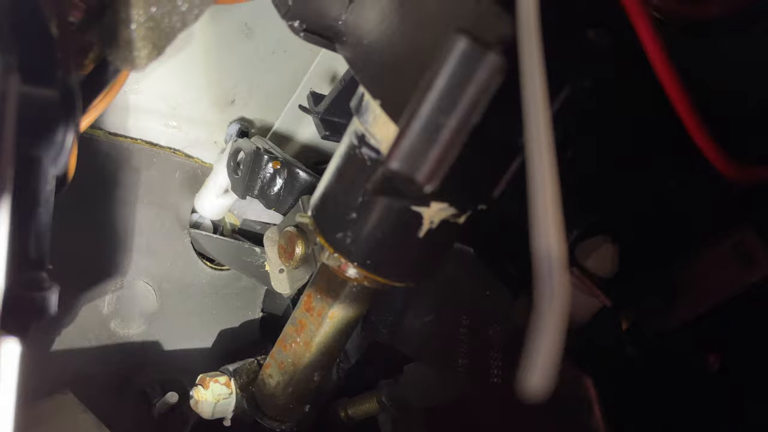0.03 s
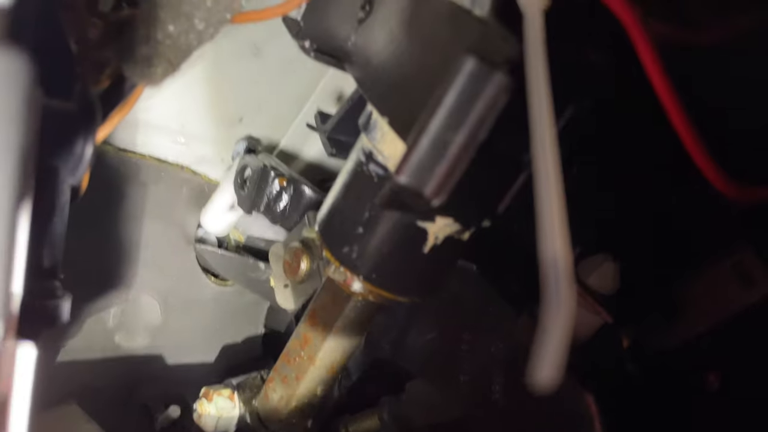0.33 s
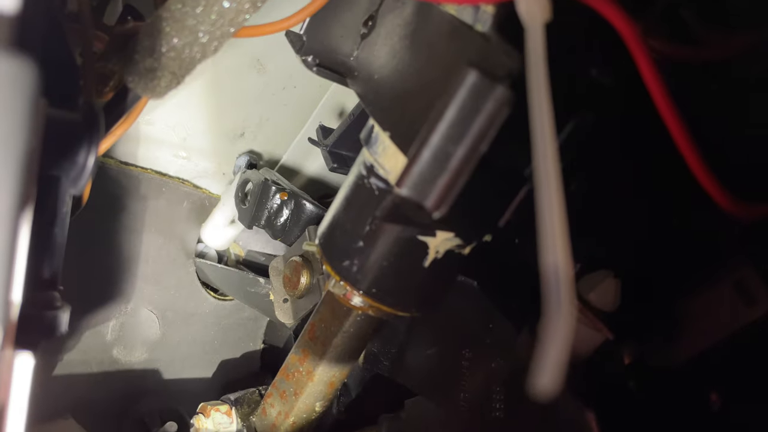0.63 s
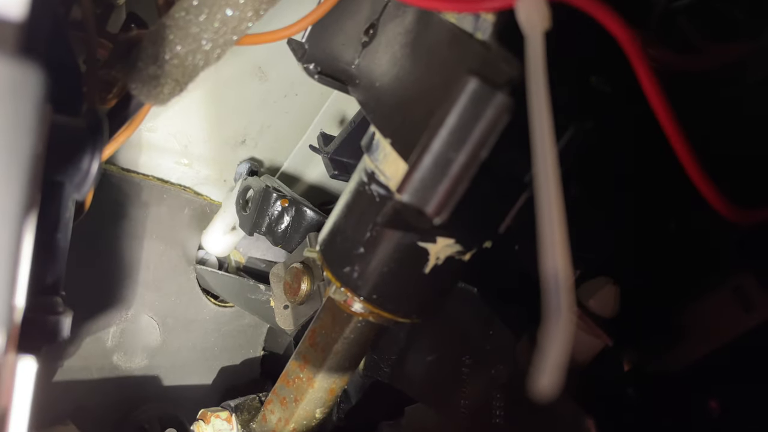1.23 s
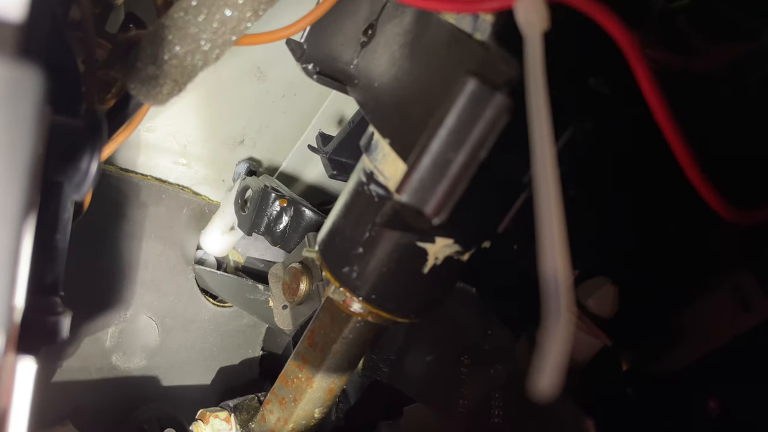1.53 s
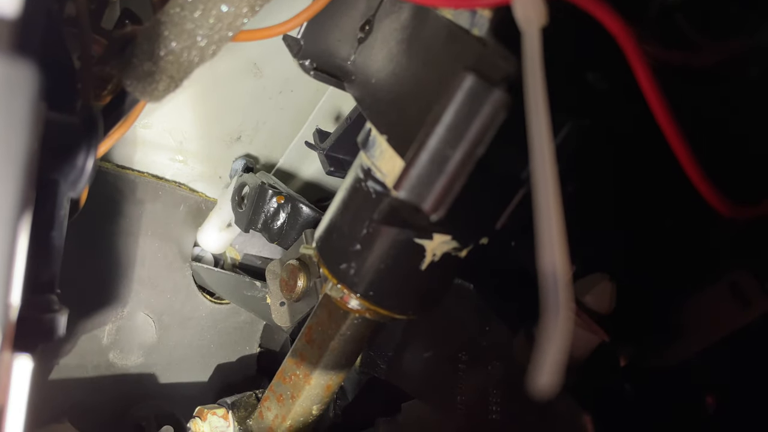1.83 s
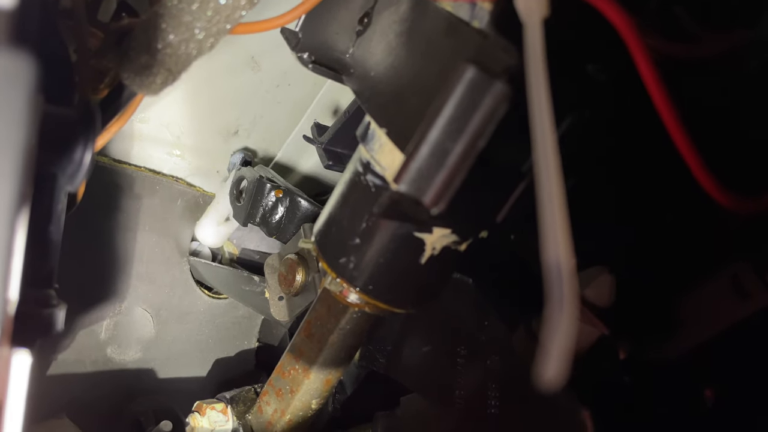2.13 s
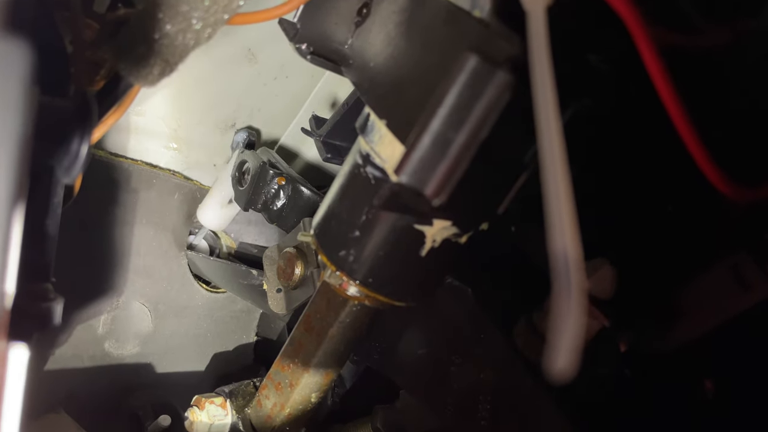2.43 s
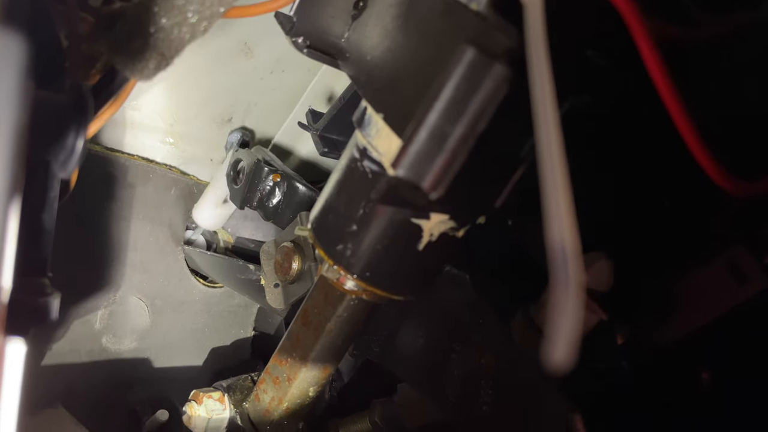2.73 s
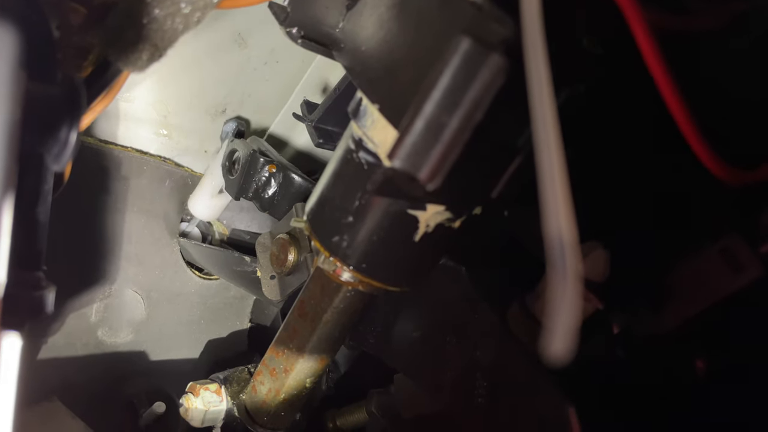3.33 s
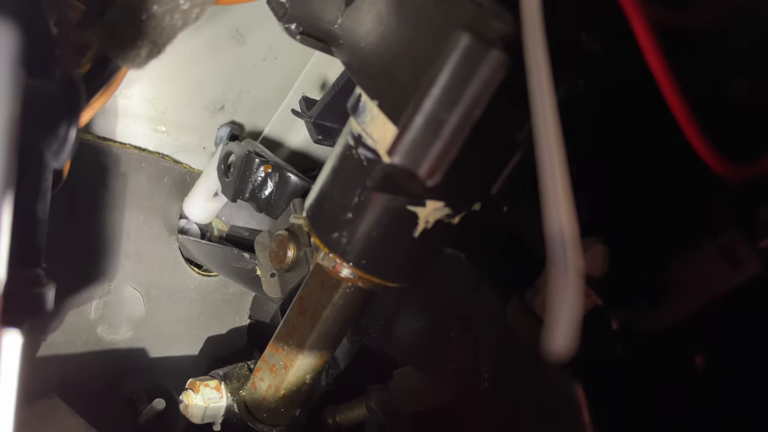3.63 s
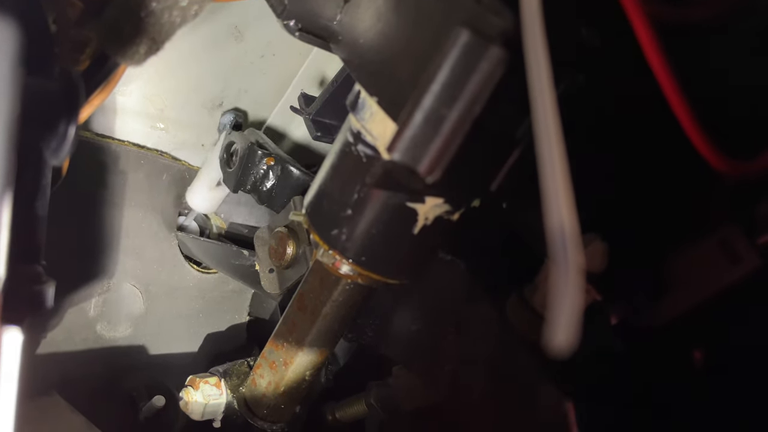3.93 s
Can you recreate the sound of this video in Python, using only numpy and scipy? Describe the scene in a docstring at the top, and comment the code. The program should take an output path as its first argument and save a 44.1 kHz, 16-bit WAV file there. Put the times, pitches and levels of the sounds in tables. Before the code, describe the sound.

A metal pedal linkage knocks and clicks irregularly over a low handling rumble.

```python
"""Under a car dashboard, a metal pedal linkage is worked by hand, close to the microphone.
The pedal rubs as it moves, and knocks at its stops ring the bracket and boom in the bulkhead, the wall
behind it. Loose parts tap, surfaces scrape, and the joints click and once slip with a rasp.
Below it all lie a slowly sinking hum, handling rumble and faint hiss."""
import sys
import numpy as np
from scipy import signal
from scipy.fft import rfft, irfft
from scipy.io import wavfile
from scipy.ndimage import uniform_filter1d

SR = 44100
rng = np.random.default_rng(int(sys.argv[2]) if len(sys.argv) > 2 else 0)


def bounce(signal):
    """Save signal as a 16-bit WAV file at the path given by the first command-line argument."""
    frames = np.transpose(np.atleast_2d(signal))
    limited = np.clip(frames, -1, 1)
    pcm = np.round(limited * 32767).astype(np.int16)
    wavfile.write(sys.argv[1], SR, pcm)


N = 176400

# Levels are relative. A TONE says how strong each pitch is; t60 is the time to fade by 60 dB.
# pitch of the hum (t/s, f/Hz)
HUM_PITCH = [(.1, 57.5), (.8, 56.2), (1.67, 54.1), (2.25, 51.9), (3.26, 48.2), (3.72, 47.6), (4, 44.5)]
# loudness of the hum, rumble, hollow rub and scrape over time (t/s, level/dB)
HUM_LEVEL = [(0.1, -48.5), (0.81, -43), (0.87, -58), (0.92, -48.5), (1.67, -37.5), (1.87, -44.5),
             (2.32, -39.5), (2.57, -42), (2.59, -47), (2.63, -36.5), (2.78, -45), (2.95, -37.5), (3.0, -43),
             (3.3, -43.5), (3.53, -35), (3.72, -46.5), (3.75, -40), (4.0, -55.5)]
RUMBLE_LEVEL = [(0, -46), (.5, -47), (.8, -50.5), (1.5, -48.5), (2, -48.5), (2.4, -42), (2.7, -50.5),
                (3.1, -44), (3.35, -47), (3.6, -45.5), (4, -49.5)]
HOLLOW_LEVEL = [(.1, -79), (.3, -83), (.45, -69.5), (.52, -83), (.66, -82), (.78, -93)]
SCRAPE_LEVEL = [(.1, -93), (.5, -80), (1.19, -77.5), (1.28, -70), (1.39, -69), (1.46, -78), (1.53, -71),
                (1.62, -72.5), (1.78, -82.5), (1.92, -72.5), (2.01, -67), (2.12, -61.5), (2.19, -66.5),
                (2.25, -59.5), (2.325, -47.5), (2.375, -49), (2.42, -58), (2.45, -70), (2.6, -91)]
# mix of slow and fast wobbles in the loudness of the hum and the scrape (f/Hz, level/dB)
HUM_WAVER = [(2, -8.5), (9, -13), (14, -4.5)]
SCRAPE_JERK = [(8, 2.5), (40, -7.5), (120, -10.5)]
# tone of each noisy sound (f/Hz, level/dB)
RUMBLE_TONE = [(20, -18), (45, -5), (62, 2), (90, -5), (125, -12), (180, -20.5), (260, -33.5), (600, -55)]
HISS_TONE = [(100, 12.5), (300, 4.5), (700, 2), (1100, -4.5), (2500, -10), (5000, -12.5), (7500, -11.5),
             (10500, -15), (13000, -25.5), (16000, -39.5)]
SCRAPE_HISS_TONE = [(700, -5.5), (1000, 1.5), (1500, 0), (2600, -2.5), (4000, -5.5), (5500, -8.5),
                    (7500, -17.5), (11000, -19.5), (15000, -44)]
SCRAPE_BODY_TONE = [(100, 18), (220, 13), (400, -0.5), (720, 3.5), (1000, -18)]
PEDAL_TONE = [(120, 5.5), (300, 4), (600, -0.5), (1000, -10.5), (1600, -21), (2500, -20.5), (4000, -28.5),
              (7000, -33), (14000, -40)]
SNAP_TONE = [(500, 1), (1400, -16.5), (2200, -3), (3000, 4), (4000, -2.5), (5200, -1), (7000, -11),
             (10000, -35)]
TICK_TONE = [(3000, -28.5), (6000, -21), (8000, 6.5), (10500, -1.5), (13000, -6), (16000, -0.5)]
RATTLE_TONE = [(150, -25), (400, 8), (800, -4.5), (1500, -6.5), (3000, -19), (8000, -39)]
# notes of a hollow part (f/Hz, width/Hz, level/dB)
HOLLOW_NOTES = [(735, 190, 15.5), (2370, 700, 1), (4660, 1500, -6)]
# notes of the steel linkage (f/Hz, level/dB compared with the plain sound)
STEEL_NOTES = [(1050, -22), (1450, -1), (2510, 0), (2756, -5.5), (3175, 0), (3635, 1), (5180, 2),
               (10470, 2)]
# pedal strokes (loudest t/s, level/dB, rise from half strength/s, fall to half strength/s)
PEDAL_STROKES = [(.19, -68, 0.029, 0.02), (2.864, -46.5, 0.02, 0.015), (3.147, -54.5, 0.043, 0.028),
                 (3.482, -54, 0.031, 0.031), (3.781, -54.5, 0.029, 0.023)]
# taps of loose parts (t/s, level/dB, f/Hz, t60/s)
LOOSE_TAPS = [(.164, -61, 420, 0.095), (.212, -56.5, 503, 0.047), (0.281, -58, 233, 0.14),
              (1.004, -57.5, 885, 0.11), (1.021, -55, 357, 0.14), (1.203, -68, 1300, 0.026),
              (1.217, -62.5, 660, 0.059), (1.255, -60, 750, .04), (1.39, -63.5, 950, 0.049),
              (1.622, -68, 1380, 0.17), (2.02, -55, 1520, 0.042), (2.068, -58, 744, 0.08),
              (2.139, -57.5, 1010, 0.038), (2.547, -69, 880, 0.047), (2.829, -62, 636, .06),
              (2.957, -66, 1450, 0.047), (3.137, -57, 617, 0.029), (3.418, -63.5, 736, 0.044),
              (3.44, -62, 630, 0.079), (3.54, -63, 814, 0.065)]
# clicks of the joints (t/s, snap level/dB, tick level/dB, t60/s)
JOINT_CLICKS = [(0.202, -60.5, -71, 0.029), (1.002, -61, -97, 0.013), (1.215, -69, -91, 0.019),
                (1.255, -61, -72.5, 0.023), (1.393, -57, -84, 0.014), (1.622, -78, -53, 0.096),
                (2.103, -66, -61, 0.043), (2.109, -57, -47.5, 0.036), (2.1234, -46.5, -41, 0.017),
                (2.247, -78, -50.5, 0.012), (2.361, -48.5, -43, 0.033), (2.364, -53, -52, 0.012),
                (2.429, -68, -54.5, 0.02), (2.44, -82, -57, 0.016), (2.545, -65, -60, 0.016),
                (2.8622, -52.5, -53, 0.025), (2.8799, -51, -44, 0.014), (2.974, -63, -57.5, 0.027),
                (2.99, -51.5, -59, 0.022), (2.996, -50, -45, 0.0063), (3.054, -72, -63.5, 0.023),
                (3.173, -66, -67, 0.09), (3.371, -76, -63, 0.016), (3.476, -52, -65, 0.029),
                (3.483, -78, -59, 0.025), (3.498, -64.5, -54.5, 0.043), (3.530, -85, -50.5, 0.0083),
                (3.545, -80, -47.5, 0.007), (3.599, -68, -64, 0.025), (3.608, -52.5, -58, 0.012),
                (3.622, -55, -50, 0.0048), (3.671, -82, -68.5, 0.17), (3.734, -67, -68, 0.022),
                (3.754, -87, -60, .015), (3.768, -59.5, -47.5, 0.01), (3.784, -70, -58, 0.025),
                (3.809, -68, -58, 0.036)]
# knocks at the stops (t/s, bracket level/dB, boom level/dB, contact/ms, rattle level/dB,
# left over right/dB, bracket pitch ratio under the load)
STOP_KNOCKS = [(.478, -43, -36, 0.43, -80, 0, 1.03), (1.622, -44.5, -27.5, 1.18, -56, 4, 1.02),
               (1.652, -60, -30.5, 1.3, -69, 3.5, 0.89), (2.473, -74, -20.5, 2.36, -90, 3.5, 1.1),
               (2.865, -36.5, -61, 0.21, -68, 17, 0.99), (2.8683, -21.5, -22, 0.7, -58, 5.5, 0.96),
               (2.918, -44, -25, 1.65, -82, 1.5, 0.96), (3.187, -27, -30, 1.98, -56.5, 7, 0.985),
               (3.483, -31.5, -64, 0.37, -53, 5, 0.99), (3.4869, -38.5, -25.5, .8, -74, 6, 0.99),
               (3.532, -63, -19, 2.23, -75, 3, 0.76), (3.791, -43, -34, 1.44, -87, 5.5, 1.16)]
# notes of the struck bracket and bulkhead (f/Hz, level/dB, t60/s)
BRACKET_NOTES = [(302, -5.5, .09), (342, -6.5, 0.1), (413, -11, 0.081), (404, 4.5, 0.028),
                 (544, 4.5, 0.029), (614.6, 1.5, 0.046), (686, -2.5, 0.045), (710, -15.5, 0.066)]
BULKHEAD_NOTES = [(68, -7, 0.091), (90.9, -3, .27), (125.4, -9, .3), (135.8, 3, 0.25), (154.6, 5.5, 0.073),
                  (208.5, -0.5, 0.2)]
# phase of the left side against the right in the high treble, where the right runs ahead (f/Hz, phase/radians)
RIGHT_LEAD = [(6700, -2), (7600, -2.5), (8500, -3.5), (10300, -6), (12500, -7.5), (14600, -9.5),
              (15500, -8.5)]


def undb(db):
    return 10 ** (np.asarray(db) / 20)


def clock():
    return np.arange(N) / SR


def curve(rows):
    """Straight lines in time through the rows."""
    return np.interp(clock(), *np.array(rows).T)


def pan(db):
    """Left and right gains, with the left louder by db."""
    return undb(np.array([[db], [-db]]) / 2)


def unit(x):
    """Scale to an average power of 1."""
    return x / np.sqrt(np.mean(x ** 2))


def colour(x, tone):
    """Filter by a tone table, falling away past its ends; white noise keeps its power."""
    hz, db = np.array(tone, float).T
    f = np.maximum(np.arange(N // 2 + 1) * SR / N, 1)
    gain = undb(np.interp(np.log(f), np.log(hz), db))
    gain *= np.minimum(f / hz[0], 1) ** 2 * np.minimum(hz[-1] / f, 1) ** 2
    # build the filter so that it rings only after a sound, never before
    cepstrum = irfft(np.log(unit(gain) + 1e-6), N)
    causal = cepstrum * (1 + np.sign(N / 2 - np.arange(N)))
    causal[0] = cepstrum[0]
    return irfft(rfft(x) * np.exp(rfft(causal)), N)


def dull(x, hz):
    """Cut away the sound above hz."""
    return signal.sosfilt(signal.butter(6, min(hz, SR / 4), fs=SR, output="sos"), x)


def resonate(x, hz, width):
    """Keep a band of sound around hz."""
    return signal.lfilter(*signal.iirpeak(hz, hz / width, fs=SR), x)


def noise(grain=0):
    """Stereo noise, alike on both sides in the bass; grain bunches it into tiny uneven bursts."""
    mid, side = rng.standard_normal((2, N))
    side = signal.sosfilt(signal.butter(1, 330, "high", fs=SR, output="sos"), side)
    bursts = np.exp(grain * unit(uniform_filter1d(rng.standard_normal(N), size=60)))
    return unit(np.array([mid + side, mid - side]) * bursts)


def fade(start, t60, rise_s=0.00051):
    """A loudness shape that jumps up at start and dies away."""
    age = np.maximum(clock() - start, 0)
    return (1 - np.exp(-np.minimum(age / rise_s, 20))) * undb(-60 * np.minimum(age / t60, 4))


def ring(notes, rise_s, phase=0, ratio=1):
    """Half a second of a struck part's fading notes; the left leads by phase, ratio shifts the pitch."""
    t, sound = np.arange(SR // 2) / SR, 0
    for hz, db, t60 in notes:
        angle = 2 * np.pi * hz * ratio * (1 + 0.006 * rng.standard_normal()) * t
        sound += undb(db) * np.sin([angle, angle - phase]) * undb(-60 * t / t60)
    sound *= 1 - np.exp(-t / rise_s)
    return sound / np.abs(sound).max()


def add(out, start, x):
    i = int(start * SR)
    out[:, i:i + x.shape[1]] += x[:, :N - i]


def background(waver_db=1.36):
    """A wavering hum sinks in pitch over handling rumble and hiss."""
    waver = waver_db * unit(colour(rng.standard_normal(N), HUM_WAVER))
    angle = 2 * np.pi * np.cumsum(curve(HUM_PITCH)) / SR
    hum = np.sqrt(2) * np.sin(angle) * undb(curve(HUM_LEVEL) - 0.5 + waver)
    rumble = colour(noise(), RUMBLE_TONE) * undb(curve(RUMBLE_LEVEL))
    hiss = colour(noise(), HISS_TONE) * undb(-77.5)
    return (hum + rumble) * pan(2.5) + hiss


def hollow_rub():
    """Light rubbing brings out three broad notes of a hollow part."""
    rub = noise(grain=0.4)
    notes = sum(undb(db) * resonate(resonate(rub, hz, width), hz, width)
                for hz, width, db in HOLLOW_NOTES)
    return unit(notes) * undb(curve(HOLLOW_LEVEL))


def scrape(jerk_db=1.5):
    """Surfaces slide jerkily with a hiss and a low body, loudest in one firm sweep."""
    jerk = jerk_db * unit(colour(rng.standard_normal(N), SCRAPE_JERK))
    db = curve(SCRAPE_LEVEL)
    body_db = db.max() + 0.95 * (db - db.max()) + 1  # swells a little less than the hiss
    hiss = colour(noise(grain=0.099) * undb(db + jerk - 5.5), SCRAPE_HISS_TONE)
    body = colour(noise() * undb(body_db + jerk), SCRAPE_BODY_TONE)
    return (hiss + body) * pan(-1.5)


def steel_ring(x):
    """The steel linkage adds its own ringing notes to whatever shakes it."""
    return x + sum(undb(db) * resonate(x, hz, width=15) for hz, db in STEEL_NOTES)


def pedal_rub():
    """Grainy rubbing swells as the pedal travels and dies away when it stops."""
    effort = 0
    for peak, db, rise, fall in PEDAL_STROKES:
        age = clock() - peak
        effort += undb(db) / (1 + np.maximum(-age / rise, age / fall) ** 2)
    return colour(noise(grain=0.42) * effort, PEDAL_TONE) * pan(3.5)


def taps(width_share=0.53):
    """Each small loose part chatters for an instant on its own hollow note."""
    chatter, out = noise(grain=0.1), 0
    for start, db, hz, t60 in LOOSE_TAPS:
        width = width_share * hz
        note = resonate(resonate(chatter, hz, width), hz, 2 * width)
        out += unit(note) * fade(start, t60) * undb(db)
    return out


def clicks():
    """Metal joints click with a snap, a bright tick and a faint tail."""
    snap, tick = 0, 0
    for start, snap_db, tick_db, t60 in JOINT_CLICKS:
        shape = fade(start, t60) + undb(-28) * fade(start, t60=0.17)
        snap += undb(snap_db) * shape
        tick += undb(tick_db) * shape
    return colour(noise(grain=0.13) * snap, SNAP_TONE) + colour(noise(grain=0.19) * tick, TICK_TONE)


def knocks(boom_lag_s=0.00553):
    """A short push rings the bracket; the bulkhead booms just after and loose parts rattle."""
    out, shake, t = np.zeros((2, N)), 0, np.arange(SR // 100) / SR
    for start, bracket_db, boom_db, contact_ms, rattle_db, pan_db, ratio in STOP_KNOCKS:
        sides = pan(pan_db)
        push = np.sin(np.pi * np.minimum(t / (contact_ms / 1000), 1))
        bracket = ring(BRACKET_NOTES, rise_s=0.0013, phase=1.2, ratio=ratio)
        clack = dull(signal.fftconvolve(bracket, [push / push.sum()]), hz=775 * ratio)
        add(out, start, -clack * undb(bracket_db) * sides)
        bulkhead = ring(BULKHEAD_NOTES, rise_s=0.00096)
        boom = dull(bulkhead, hz=220.4 / contact_ms)  # a longer contact sounds duller
        add(out, start + boom_lag_s, -boom * undb(boom_db) * sides)
        shake += fade(start, t60=0.086) * undb(rattle_db) * sides
    return out + colour(noise(grain=0.47) * shake, RATTLE_TONE)


def rasp(start_s=1.618, rise_s=0.0026, hold_s=0.034, t60=0.1):
    """A joint slips once, drawing its snap and tick out into a short rasp."""
    age = clock() - start_s
    slip = np.clip(age / rise_s, 0, 1) * undb(-60 * np.maximum(age - hold_s, 0) / t60)
    snap = colour(noise(grain=0.13) * undb(-63) * slip, SNAP_TONE)
    tick = colour(noise(grain=0.18) * undb(-62) * slip, TICK_TONE)
    return snap + dull(tick, hz=12300)


def scene():
    """All the sounds together; the small metal ones also set the linkage ringing."""
    linkage = knocks() + steel_ring(clicks() + rasp() + taps() + pedal_rub() + scrape())
    return linkage + hollow_rub() + background()


def record(dry, start_s=0.082, shared_above_hz=6030, top_hz=15900):
    """The sound starts after a brief silence; both sides share the high treble, slightly offset,
    and the very top is cut."""
    f = np.arange(N + 1) * SR / (2 * N)
    left, right = rfft(np.hstack([dry, np.fliplr(dry)]))  # a mirrored copy keeps the ends smooth
    share = np.clip((f - shared_above_hz) / 800 + .5, 0, 1)
    lead = np.interp(f, *np.array(RIGHT_LEAD).T)
    right = np.sqrt(1 - share) * right + np.sqrt(share) * left * np.exp(-1j * lead)
    fade_in = np.clip((clock() - start_s) / 0.0038, .002, 1)
    top_cut = signal.ellip(10, .2, 80, top_hz, fs=SR, output="sos")
    return signal.sosfilt(top_cut, irfft([left, right])[:, :N] * fade_in)


dry = scene()
out = record(dry)
bounce(out)
```